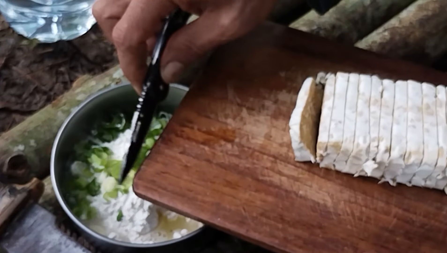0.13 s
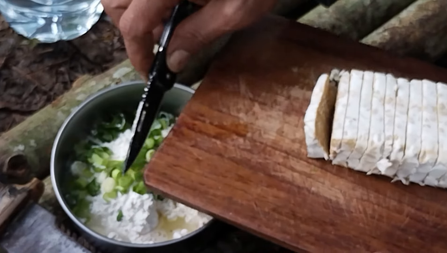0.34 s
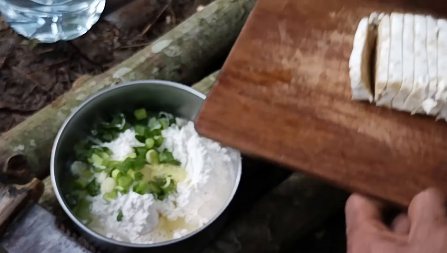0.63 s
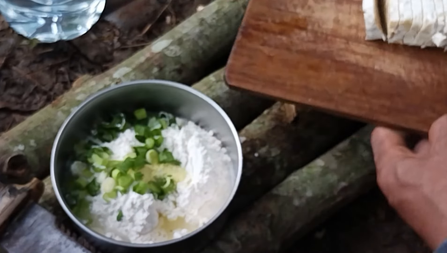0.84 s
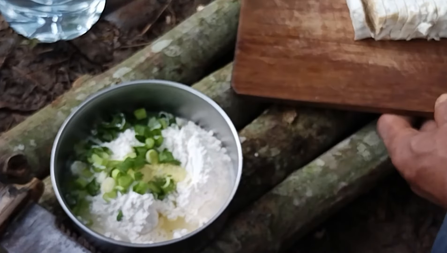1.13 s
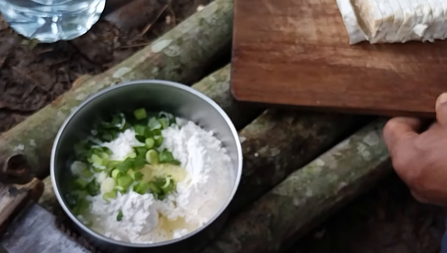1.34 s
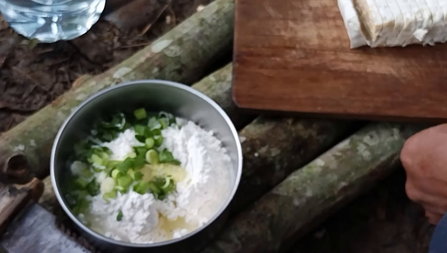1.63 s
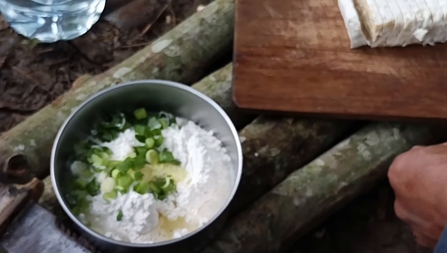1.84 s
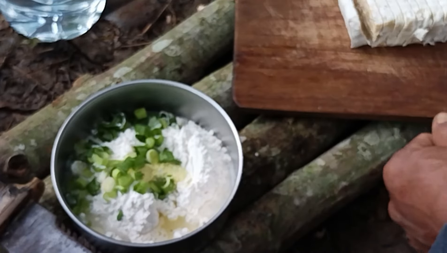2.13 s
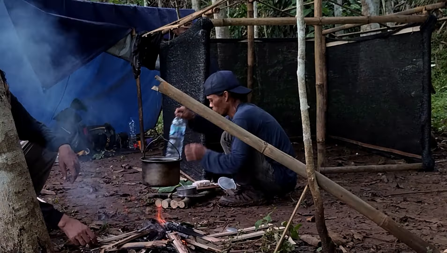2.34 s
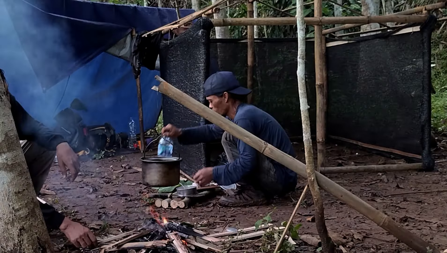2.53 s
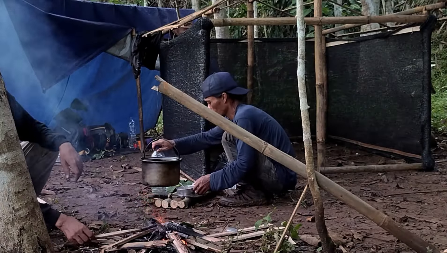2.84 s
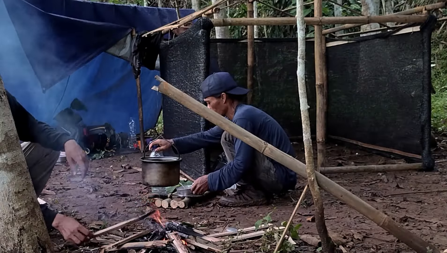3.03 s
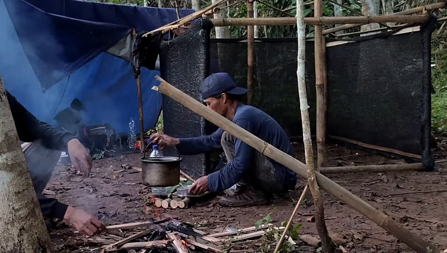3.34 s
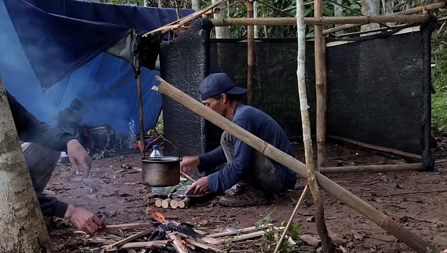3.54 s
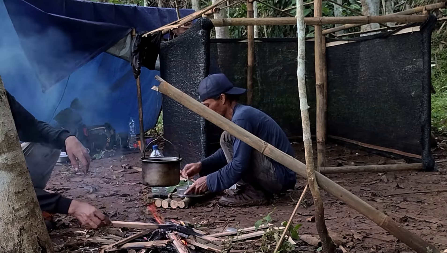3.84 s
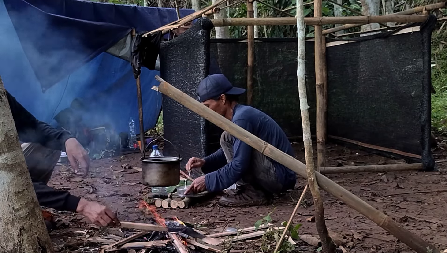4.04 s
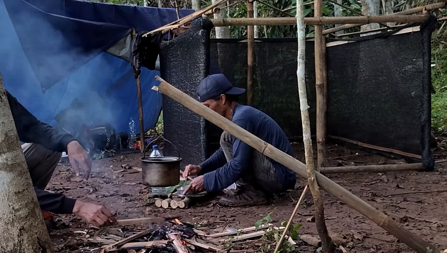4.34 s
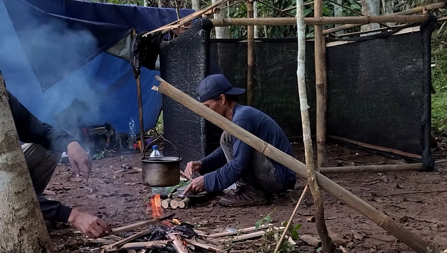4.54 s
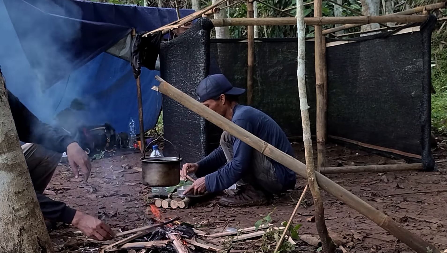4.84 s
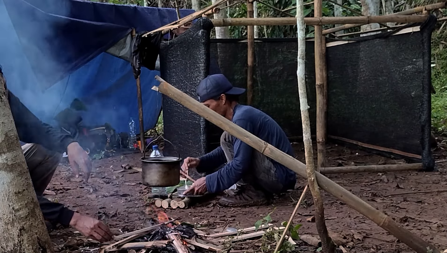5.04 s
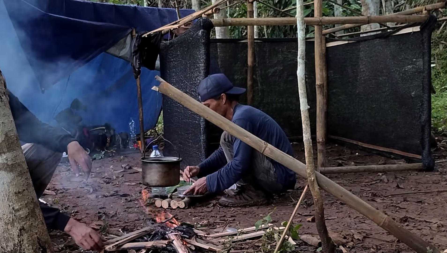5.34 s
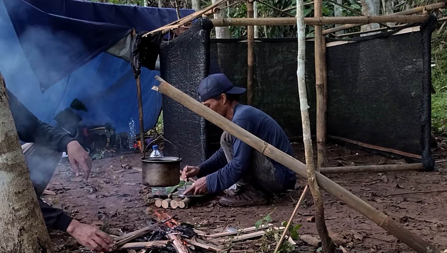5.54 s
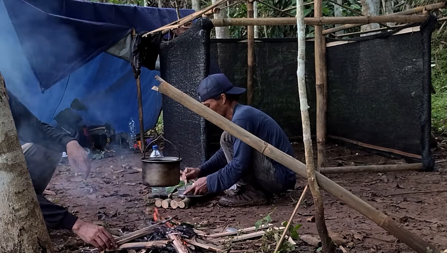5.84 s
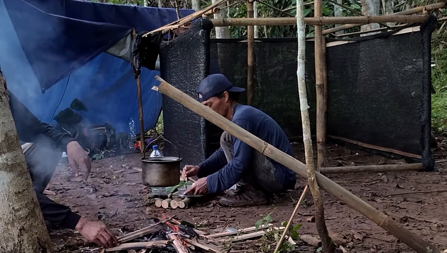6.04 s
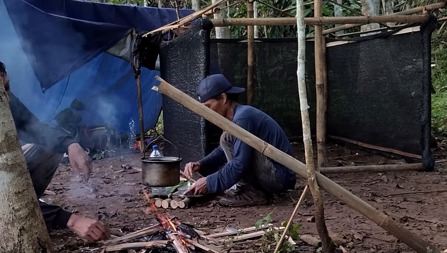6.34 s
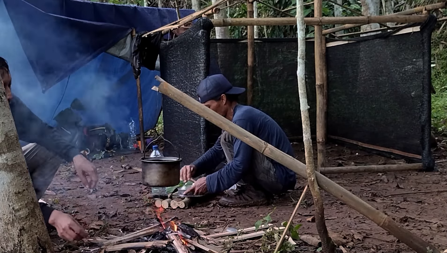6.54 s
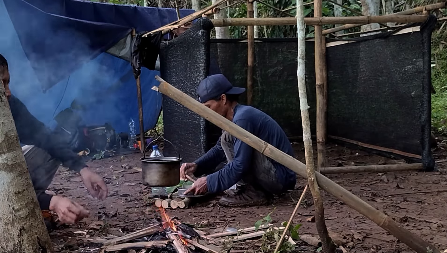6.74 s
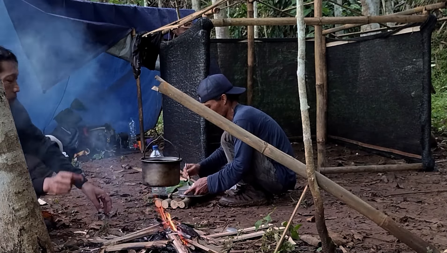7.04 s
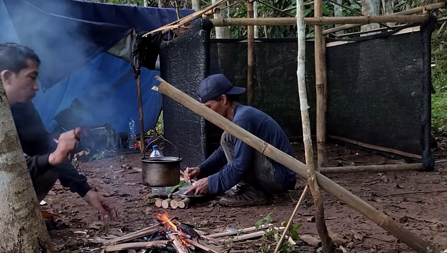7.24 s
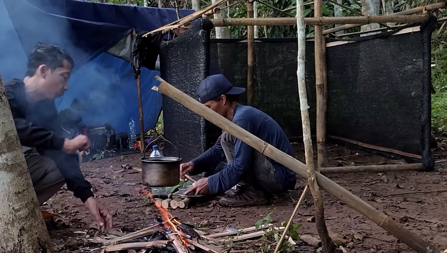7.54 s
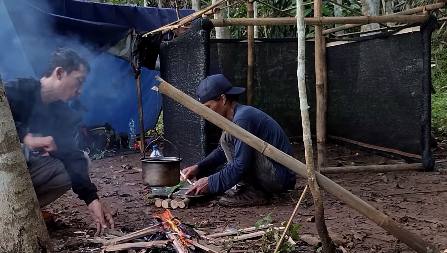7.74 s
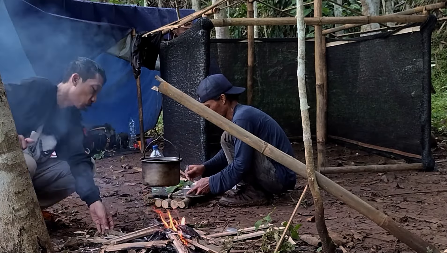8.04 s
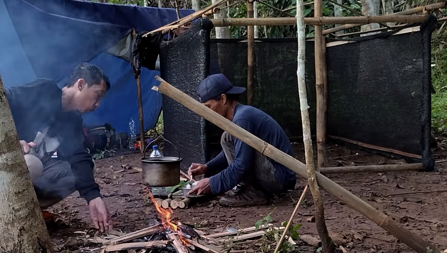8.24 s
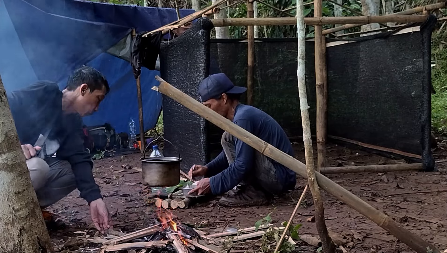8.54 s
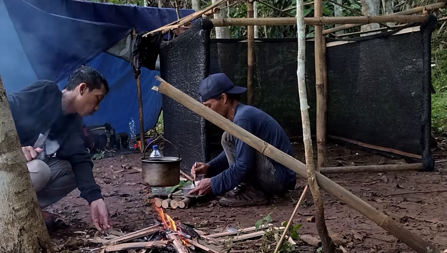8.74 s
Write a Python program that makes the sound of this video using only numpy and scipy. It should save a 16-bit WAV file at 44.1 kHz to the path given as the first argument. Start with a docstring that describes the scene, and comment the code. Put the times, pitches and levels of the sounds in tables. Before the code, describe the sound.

In a forest camp, a near cricket ahead of the microphone loops a crescendo of quick wing strokes twice a second. Another chirps on the right, with fine trills, buzzes and ticks to the left and dry snaps right. A faint scrape and wooden board clacks come early. At about 2.4 seconds a small click marks a cut, and the same insects continue softer and farther away.

```python
"""A near cricket loops one rising phrase of wing strokes ahead of the microphone, in a forest camp at night.
On the right a second cricket chirps gliding strokes; others trill, buzz and tick round about, made of pulsed tones
and filtered clicks or noise. Shaped noise gives the air and the blur of far insects.
A board set down by the microphone rings as decaying tones; then a cut leads to a wider, quieter shot."""
import sys
import numpy as np
from scipy import signal
from scipy.fft import rfft, irfft, next_fast_len
from scipy.io import wavfile
from scipy.ndimage import uniform_filter1d, map_coordinates

SR = 44100
rng = np.random.default_rng(int(sys.argv[2]) if len(sys.argv) > 2 else 0)


def wav_record(signal):
    """Record a signal, one row per channel, as 16-bit PCM in the file named by sys.argv[1]."""
    frames = np.transpose(np.atleast_2d(signal))
    bounded = np.clip(frames, -1, 1)
    # unit amplitude maps onto the largest positive 16-bit level
    quanta = np.round(bounded * 32767).astype(np.int16)
    wavfile.write(sys.argv[1], SR, quanta)


N = 391608
T = np.arange(N) / SR
CUT_S = 2.37  # the closer shot ends here
# Table levels are nominal: random swings and the gains for side, shot and mix come on top.


def amp(db):
    """Gain of a level in dB."""
    return 10 ** (np.asarray(db) / 20)


def unit(x):
    """x at rms 1."""
    return x / np.sqrt(np.mean(x ** 2) + 1e-20)


def curves(rows):
    """One value per sample for each column after the time."""
    s, *cols = np.transpose(rows)
    return [np.interp(T, s, c) for c in cols]


def wobble(rate):
    """A smooth random curve, rate knots a second, held in steps of 16 samples."""
    knots = rng.standard_normal(int(N * rate / SR) + 4)
    return map_coordinates(knots, [T[::16] * rate]).repeat(16)[:N]


def filtered(x, response):
    """x times a response of frequency, zero-padded against wrap-round."""
    m = next_fast_len(N + SR // 2)
    return irfft(rfft(x, m) * response(np.fft.rfftfreq(m, 1 / SR)), m)[..., :N]


def band(lo_hz, hi_hz, order):
    """Response of a band-pass; a higher order has steeper edges."""
    return lambda f: 1 / (1 + (lo_hz / (f + 1)) ** order) / (1 + (f / hi_hz) ** order)


def tone(hz):
    """A sine that follows a pitch curve."""
    return np.sin(2 * np.pi * np.cumsum(hz) / SR)


def add(track, s, sound):
    """Lays a sound into the track at a time."""
    i = int(np.clip(round(s * SR), 0, N))
    track[i:i + len(sound)] += sound[:len(track) - i]


def close(db):
    """Extra gain during the first, closer shot."""
    return np.where(T < CUT_S, amp(db), 1)


def trees(x, t60):
    """Scattered answer of trunks and leaves: decaying noise, different at each ear."""
    t = np.arange(SR // 4) / SR
    tail = rng.standard_normal((2, len(t))) * amp(-60 * t / t60) * (t > .004)
    return signal.oaconvolve(x[None], tail / np.linalg.norm(tail[0]), axes=1)[:, :N]


def rush(points, alike, patchy_db):
    """Stereo noise of rms 1 with patches of random gain; alike is the likeness of the two ears."""
    z = signal.stft(rng.standard_normal((2, N), dtype=np.float32), nperseg=512)[2]
    # smoothed over frequency, then over time
    field = uniform_filter1d(uniform_filter1d(rng.standard_normal(z.shape[1:]), 5, 0), 8, 1)
    pair = signal.istft(z * amp(patchy_db * unit(field)), nperseg=512)[1][:, :N]
    f, db = np.transpose(points)
    a, b = filtered(pair, lambda hz: amp(np.interp(np.log(hz + 1), np.log(f + 1), db, -120, -120)))
    turn = np.arccos(np.clip(alike, -1, 1)) / 2
    mid, side = np.cos(turn) * a, np.sin(turn) * b
    return unit(np.array([mid + side, mid - side]))


def scratches(events, t60, response):
    """Short bursts of noise, each fading by 60 dB in t60 seconds, through one filter."""
    out, t = np.zeros(N), np.arange(SR // 16) / SR
    for s, db in events:
        add(out, s, amp(db - 60 * t / t60) * rng.standard_normal(len(t)))
    return filtered(out, response)


def bout_times(bouts):
    """Evenly spaced times from first to last of each bout."""
    return np.concatenate([np.linspace(first, last, count) for first, last, count in bouts])


def stray(count, top_db, range_db):
    """Faint events at chance times, as pairs of start_s and level_db."""
    return [(s * N / SR, top_db - range_db * u) for s, u in rng.random((count, 2))]


# strokes in one phrase of the near cricket:
# offset_s, length_s, peak_place (0-1), level_db, start_hz, middle_hz, end_hz
NEAR_PHRASE = [(0.054, 0.019, 0.9, -52, 4400, 4228, 4230), (0.105, 0.023, 0.53, -36, 4396, 4390, 4105),
               (0.148, 0.023, 0.59, -34.5, 4540, 4324, 4206),
               (0.1917, 0.024, 0.85, -33.5, 4548, 4432, 4297),
               (0.244, 0.025, 0.52, -32.5, 4500, 4356, 4210), (0.287, .015, 0.54, -32, 4438, 4332, 4330),
               (0.327, 0.016, 0.56, -30.5, 4433, 4450, 4320), (0.372, 0.02, 0.85, -28.5, 4550, 4415, 4366),
               (0.421, 0.018, 1, -26.5, 4445, 4393, 4358), (0.471, 0.023, 0.94, -28, 4415, 4430, 4360)]
# returns from the ground and nearest trunks: delay_s, level_db
NEAR_ECHOES = [(.0045, -13), (.009, -18), (0.019, -28.5), (0.035, -25.5)]
PHRASE_S, FIRST_S = .5, -.3766  # length of a phrase, start of the first
SKIP_S = .0334  # song time lost at the cut


def near_cricket():
    """Each wing stroke swells and stops, its pitch bending down at the end as the wing slows."""
    clock = (T + SKIP_S * (T >= CUT_S) - FIRST_S) % PHRASE_S
    level, hz = np.zeros(N), np.full(N, 4300.)
    for s, length, peak, db, start_hz, mid_hz, end_hz in NEAR_PHRASE:
        u = (clock - s) / length
        on = (u > 0) & (u < 1)
        rise_fall = np.interp(u[on], [0, peak, 1], [0, 1, 0])
        level[on] = amp(db) * np.abs(np.sin(np.pi / 2 * rise_fall)) ** 0.91
        last_hz = end_hz - 1.8 * (mid_hz - end_hz)
        hz[on] = np.interp(u[on], [0, .55, .85, 1], [start_hz, mid_hz, end_hz, last_hz])
    song = uniform_filter1d(level, size=90) * amp(0.12 * wobble(71))
    song = song * tone(uniform_filter1d(hz, size=60))
    song = filtered(song, band(4065, 5200, order=30))
    direct = song * amp([[.1], [-.1]])
    echoes = sum(amp(db) * np.pad(song, (round(s * SR), 0))[:N] for s, db in NEAR_ECHOES)
    low = filtered(song, lambda f: 1 / (1 + ((f - 4200) / 150) ** 2))  # foliage returns the lower pitches best
    tail = amp(-16.5) * np.array([[.7, .3], [.3, .7]]) @ trees(low, t60=0.3)  # mostly from ahead
    return close(4.32) * (direct + echoes + tail + amp(-34.5) * trees(song, t60=0.25))


# overall level of the slow trillers: time_s, level_db
SLOW_LEVEL = [(0, -67.5), (1, -69.5), (2.36, -66.5), (2.38, -77), (4, -74.5), (5.5, -78), (7, -77),
              (8.88, -79)]
# two singers drifting out of step: pulse_rate_per_s, head_start_pulses, pitch_hz
SLOW_SINGERS = [(14.56, .1, 7165), (14.39, .44, 7190)]


def slow_triller():
    """Two singers, mostly to the right, sing narrow, rough pulses about fifteen a second."""
    song = np.zeros(N)
    for rate, ahead, hz in SLOW_SINGERS:
        pulse = np.abs(np.cos(np.pi * (ahead + rate * T))) ** 6.7
        song += pulse * amp(2.5 * wobble(100)) * tone(hz + 45 * wobble(90))
    return amp(curves(SLOW_LEVEL)[0] + 5.5) * unit(song * [[-.3], [1]] + 0.46 * trees(song, t60=0.12))


# fast triller on the left: time_s, level_db, wing_pitch_hz
FAST_SONG = [(0.0, -71.5, 9940), (0.15, -76, 9570), (0.74, -69, 9690), (1.38, -74, 9600),
             (2.2, -67.5, 9740), (2.37, -75.5, 9740), (3.02, -86.5, 9640), (4.06, -77, 9750),
             (4.5, -78.5, 9670), (6.21, -79, 9700), (6.3, -80, 9720), (7.12, -78.5, 9650),
             (7.37, -82.5, 9730), (8.04, -77.5, 9690), (8.48, -88, 9620), (8.88, -76, 9750)]


def fast_triller():
    """Short falling pulses about ninety a second on the left; the wing pitch drifts."""
    db, wing_hz = curves(FAST_SONG)
    cycle = np.cumsum(91 + 0.62 * wobble(3)) / SR % 1
    gate = np.sin(np.pi * np.clip(cycle / 0.71, 0, 1)) ** 2
    hz = wing_hz + 1200 * (.3 - cycle) + 120 * wobble(200)
    song = gate * amp(2.1 * wobble(120)) * tone(hz)
    return amp(db + 2.5) * unit(song) * [[1.4], [.15]]


# low rumble, its spectrum: frequency_hz, density_db
RUMBLE_SPECTRUM = [(12, -53), (20, -25), (49, -17), (86, -6.5), (173, -0.5), (204, -3.5), (263, -7),
                   (350, -8), (460, -46.5), (770, -120)]
# low rumble, its course: time_s, level_db
RUMBLE_COURSE = [(0.0, -86), (0.81, -80.5), (0.99, -82.5), (2.17, -82), (2.4, -87), (2.67, -89),
                 (2.84, -81.5), (3.83, -81.5), (4.43, -89.5), (6.06, -87.5), (6.16, -90.5), (7.64, -85.5),
                 (8.88, -88)]
# rustle near the camp: frequency_hz, density_db
RUSTLE_SPECTRUM = [(200, -34), (400, 0), (800, -5), (1200, -3.5), (2000, -42)]
# high sizzle, its spectrum: frequency_hz, density_db
SIZZLE_SPECTRUM = [(10000, -39.5), (11500, -3), (13000, -1.5), (14500, 3), (15400, -2.5), (15700, -19.5)]
# high sizzle, its course: time_s, level_db
SIZZLE_COURSE = [(0.0, -91), (0.49, -93), (0.69, -100), (1.26, -96), (1.85, -80), (2.17, -77.5),
                 (2.52, -84), (2.89, -83.5), (3.39, -99), (4.2, -86), (4.67, -91.5), (6.35, -88.5),
                 (6.83, -84), (7.42, -95.5), (8.53, -99), (8.88, -96)]
# blur of far insects all round: frequency_hz, density_db
FOREST_SPECTRUM = [(200, -38), (400, -11), (1550, -11), (1950, -9.5), (2200, -3.5), (2500, -8.5),
                   (3300, -8.5), (3700, -18), (4100, 5), (5800, 3.5), (6600, -9.5), (7200, 5.5),
                   (8300, -19), (11000, -25)]
# far chorus, stronger on the left: frequency_hz, density_db
LEFT_SPECTRUM = [(8000, -22), (9000, -2.5), (9700, 3.5), (11000, -9.5), (11600, -23.5), (13800, -27.5),
                 (14800, -14), (15400, -14), (15700, -29)]
# highest far chorus: frequency_hz, density_db
HIGH_SPECTRUM = [(13500, -34), (14500, -14), (15100, -0.5), (15400, -8.5), (15700, -24)]
HUM_DB, HUM_CLOSE_DB = -90.5, 8  # level and its gain in the closer shot
RUSTLE_DB, RUSTLE_CLOSE_DB = -86.5, 5.5


def air():
    """Shaped noise: low rumble with a faint hum, rustle near the camp, sizzle and the blur of the forest."""
    (rumble_db,), (sizzle_db,) = curves(RUMBLE_COURSE), curves(SIZZLE_COURSE)
    hum = close(HUM_CLOSE_DB) * amp(HUM_DB + 2.6 * wobble(5.7)) * tone(176 + 2 * wobble(12))
    rumble = amp(rumble_db + wobble(7.8)) * rush(RUMBLE_SPECTRUM, 0.98, patchy_db=1.0) * amp([[-1], [1]])
    rustle = close(RUSTLE_CLOSE_DB) * amp(RUSTLE_DB + 0.59 * wobble(2.7))
    rustle = rustle * rush(RUSTLE_SPECTRUM, 0.23, patchy_db=-0.5)
    sizzle = amp(sizzle_db + 5.5 + 3 * wobble(9) + 2.1 * wobble(35))
    sizzle = sizzle * rush(SIZZLE_SPECTRUM, .1, patchy_db=6) * amp([[3], [-5]])
    forest = amp(-67.5) * rush(FOREST_SPECTRUM, 0, patchy_db=4.0)
    left = amp([[-73], [-86]]) * rush(LEFT_SPECTRUM, 0, patchy_db=3.5)
    high = close(3) * amp([[-86], [-84]]) * rush(HIGH_SPECTRUM, 0, patchy_db=0.5)
    return rumble + hum + rustle + sizzle + close(6.44) * (forest + left) + high


# lone louder ticks of the high insect: start_s, level_db
LONE_TICKS = [(.4535, -71), (1.6592, -61), (1.8988, -64), (2.1415, -63.5), (2.3194, -62.5), (3.155, -65.5),
              (5.1985, -64.5), (5.549, -65.5), (7.093, -69)]
# its runs of ticks: first_s, last_s, tick_count
RUNS = [(2.581, 3.083, 10), (6.487, 6.99, 10)]
# dry snaps on the right: start_s, level_db
SNAPS = [(.0209, -45.5), (.251, -41.5), (1.0665, -41.5), (1.9741, -44.5), (2.1135, -41.5), (2.3372, -41),
         (2.6942, -52), (2.8294, -55), (4.724, -48), (5.0614, -57), (6.271, -54), (6.4693, -44),
         (8.8639, -54)]
RUN_DB, RUN_SWELL_DB, RUN_PEAK = -59, 15, .65  # peak level, slope over a whole run, place of the peak 0-1


def ticker():
    """Noise bursts: a high insect ticks on the left, alone or in swelling runs; dry snaps come from the right."""
    runs = []
    for first, last, count in RUNS:
        for u in np.linspace(0, 1, count):
            db = RUN_DB - RUN_SWELL_DB * abs(u - RUN_PEAK) + rng.normal(0, 2.5)
            runs.append((first + u * (last - first), db))
    ticks = LONE_TICKS + runs + stray(count=40, top_db=-67, range_db=6)
    snaps = SNAPS + stray(count=11, top_db=-59, range_db=8.5)
    high = scratches(ticks, .03, band(12500, 15500, order=14))
    high += 0.64 * scratches(ticks, .15, band(14300, 15500, order=30))  # longer, higher ring
    dry_snaps = scratches(snaps, 0.017, band(3700, 7600, order=8))
    return high * [[3.5], [.55]] + dry_snaps * [[.4], [2.1]]


# one gliding stroke: time_s, pitch_hz, level_db
STROKE_GLIDE = [(-.009, 5180, -29), (-.004, 5094, -5), (0, 4974, 3), (.003, 4760, -1.5), (.008, 4590, -7),
                (0.014, 4350, -20)]


def stroke(shift_hz):
    """One wing stroke: a tone that glides down as it swells and fades, shifted in pitch."""
    s, hz, db = np.transpose(STROKE_GLIDE)
    t = np.arange(s[0], s[-1], 1 / SR)
    fade = signal.windows.tukey(len(t), .3)  # soft start and end
    return fade * np.interp(t, s, amp(db)) * tone(np.interp(t, s, hz) + shift_hz)


# bouts of the cricket on the right: first_chirp_s, last_chirp_s, chirp_count, strokes_in_last_chirp
RIGHT_BOUTS = [(.029, .6283, 4, 3), (.8645, 1.0663, 2, 3), (1.509, 2.3175, 5, 3), (2.4275, 3.243, 5, 2),
               (3.413, 3.619, 2, 2), (4.483, 4.483, 1, 2), (4.6585, 5.471, 5, 2), (5.641, 8.839, 17, 3)]
STROKES, STROKE_GAP_S = 3, .0316  # strokes in the other chirps; spacing in all
STROKE_DB, STROKE_CLOSE_DB = -33.5, 7
STROKE_SCATTER_DB, STROKE_JITTER_S = 0.97, 0.00093  # random spread


def right_cricket():
    """Gliding strokes from the right with a faint low shadow; the left ear gets them weak and inverted."""
    song, shadow = np.zeros(N), np.zeros(N)
    times = []
    for first, last, chirps, end in RIGHT_BOUTS:
        for s in np.linspace(first, last, chirps):
            count = end if s == last else STROKES
            times += [s + k * STROKE_GAP_S for k in range(count)]
    for s, (detune, size, late) in zip(times, rng.standard_normal((len(times), 3))):
        db = STROKE_DB + STROKE_CLOSE_DB * (s < CUT_S) + STROKE_SCATTER_DB * size
        s += STROKE_GLIDE[0][0] + STROKE_JITTER_S * late
        add(song, s, amp(db) * stroke(35 * detune))
        add(shadow, s, amp(db - 41) * stroke(-3900 + 35 * detune))
    sides = np.array([-.25 * amp(2.7 * wobble(120)), amp(1.5 * wobble(200))])
    return song * sides + shadow * [[-.2], [1.3]] + amp(-20.5) * trees(song, t60=0.23)


# bouts of one farther, higher cricket: first_s, last_s, chirp_count
NEIGHBOUR_BOUTS = [(.125, 1.042, 6), (1.263, 1.263, 1), (1.484, 2.226, 5), (2.512, 2.73, 2),
                   (2.923, 8.748, 33)]


def far_crickets():
    """A higher neighbour sings two strokes and a weaker third; more call at random, blurred by the trees."""
    song, times = np.zeros(N), bout_times(NEIGHBOUR_BOUTS)
    for s, size in zip(times, rng.standard_normal(len(times))):
        start = s + STROKE_GLIDE[0][0]
        add(song, start, amp(size) * stroke(190))
        add(song, start + 0.035, amp(size) * stroke(190))
        add(song, start + 0.058, amp(size - 5.0) * stroke(310))
    for s, voice, size in rng.random((260, 3)):
        add(song, s * N / SR, amp(-13 + 9 * size) * stroke(-150 + 450 * voice))
    direct = song * amp(2 * wobble(150)) * [[1], [-.8]]
    return close(6.5) * amp(-59.5) * (direct + 2.55 * trees(song, t60=0.051))


# knife on the board, click at the cut, brief rustle: centre_s, half_length_s, low_hz, high_hz, level_db
SWELLS = [(0.196, 0.11, 477, 915, -71), (2.367, 0.0053, 600, 6030, -60), (3.718, 0.086, 3490, 4070, -71)]


def scrapes():
    """Short swells of grainy band noise, equal at both ears."""
    out = np.zeros(N)
    for s, half, lo_hz, hi_hz, db in SWELLS:
        u = np.arange(-2 * half, 2 * half, 1 / SR)
        edges = band(lo_hz, hi_hz, order=24)(np.fft.rfftfreq(len(u), 1 / SR))
        noise = irfft(rfft(rng.standard_normal(len(u))) * edges, len(u))
        grain = unit(noise) * amp(2.2 * wobble(60)[:len(u)])
        add(out, s + u[0], amp(db) * np.exp(-2 * (u / half) ** 2) * grain)
    return out


# contacts of the board on the logs: start_s, level_db
BOARD_KNOCKS = [(1.41, -47), (1.419, -51), (1.433, -57), (1.519, -61), (1.528, -44.5), (1.558, -51),
                (2.304, -61.5), (8.699, -63)]
# ringing modes of the board: pitch_hz, level_db, t60_s
BOARD_MODES = [(873.5, 2.5, 0.057), (1012.8, -6.5, 0.094), (1204, -8.5, 0.052), (1647, -20, 0.05),
               (2299.6, -16, 0.088)]
# hands jogging the microphone: start_s, level_db
MIC_BUMPS = [(1.2, -78), (1.248, -56.5), (1.431, -78), (1.818, -70), (1.899, -72.5), (2.069, -65),
             (2.11, -68), (2.299, -70), (6.999, -80)]
# faint short tones: centre_s, pitch_hz, half_length_s, level_db
PINGS = [(0.349, 2104, 0.057, -79), (0.853, 2110, 0.069, -72), (3.8, 3829, 0.037, -70),
         (3.965, 2110, 0.07, -68.5), (5.846, 562.3, 0.044, -70.5), (6.104, 385.3, 0.027, -75.5),
         (6.996, 1517, 0.34, -80.5), (7.25, 2126, 0.087, -73), (7.585, 418, 0.03, -75),
         (8.48, 2073, 0.082, -75.5)]


def handling():
    """The board rings in decaying modes on the logs, hands thud on the microphone, small things ping."""
    out, t = np.zeros(N), np.arange(SR // 8) / SR
    for s, db in BOARD_KNOCKS:
        ring = sum(amp(g + rng.normal(0, 0.67) - 60 * t / t60) * np.sin(2 * np.pi * hz * t)
                   for hz, g, t60 in BOARD_MODES)
        add(out, s, amp(db - 6.0) * ring * (1 - np.exp(-t / 0.0024)))
    out += 1.03 * scratches(BOARD_KNOCKS, 0.052, band(900, 2000, order=5))  # the clack of each contact
    thuds = np.zeros(N)
    for s, db in MIC_BUMPS:
        thud = amp(db + 6.0 - 60 * t / 0.075) * np.sin(2 * np.pi * 95 * t)
        add(thuds, s, thud * (1 - np.exp(-t / 0.0017)))
    for s, hz, length, db in PINGS:
        u = np.arange(-length, length, 1 / SR)
        waver = 1 + 0.29 * uniform_filter1d(rng.standard_normal(len(u)), size=200)
        add(out, s - length, amp(db) * np.exp(-8 * (u / length) ** 2) * tone(hz * waver))
    return out * amp([[-.5], [.5]]) + thuds * [[.15], [1.8]]


# bursts of the buzzer on the left: start_s, length_s, click_rate_per_s (only the last row's rate is used, for
# all bursts), level_db
BUZZ_BURSTS = [(1.129, 0.051, 364, -52), (1.214, .04, 364, -68), (2.014, 0.056, 363, -56),
               (2.697, 0.053, 361, -61), (3.577, .055, 363, -61.5), (3.984, 0.082, 363.1, -57),
               (5.077, 0.064, 363, -59), (6.114, .06, 363, -59), (7.274, .06, 361, -57.5),
               (8.137, .06, 361, -57.5)]
BUZZ_HZ, BUZZ_WIDTH_HZ = 9900, 820  # wing resonance
BUZZ_RISE_S, BUZZ_FALL_S = 0.021, .04


def buzzer():
    """Swelling bursts of very regular clicks excite a broad wing resonance, heard on the left."""
    level, rate = np.zeros(N), np.zeros(N)
    for s, length, per_s, db in BUZZ_BURSTS:
        begin = s - .015
        knots = [begin, begin + BUZZ_RISE_S, s + 0.77 * length, s + 0.68 * length + BUZZ_FALL_S]
        shape = np.interp(T, knots, [0.012, 1, 1.0, 0.00097])  # the end values hold on outside the burst
        level += amp(db) * shape
        rate[shape > 0] = per_s  # so clicks run on faintly, at the last rate set
    count = np.floor(np.cumsum(rate + 0.71 * wobble(4)) / SR)
    clicks = np.diff(count, prepend=0) * amp(1.77 * wobble(150))
    wing = filtered(clicks, lambda f: np.exp(-.5 * ((f - BUZZ_HZ) / BUZZ_WIDTH_HZ) ** 2))
    return level * unit(wing) * [[.45], [.07]]


def scene():
    """All singers, the camp and the air."""
    singers = near_cricket() + slow_triller() + fast_triller() + right_cricket() + far_crickets()
    return singers + air() + ticker() + scrapes() + handling() + buzzer()


TOP_HZ = 15750


def record(dry):
    """The camera keeps nothing above its band limit."""
    return filtered(dry, lambda hz: hz < TOP_HZ)


dry = scene()
out = record(dry)
wav_record(out)
```